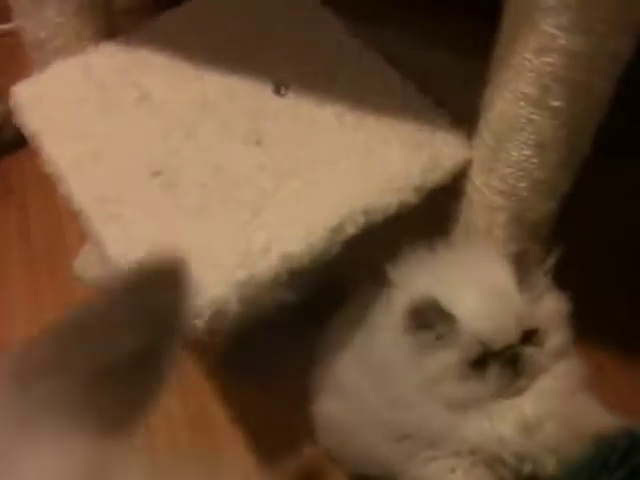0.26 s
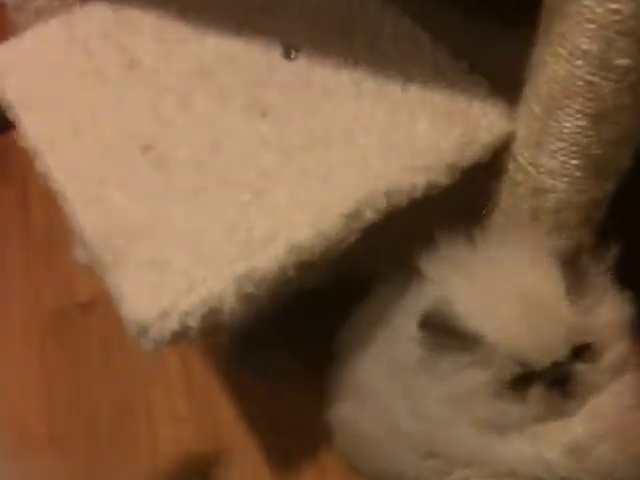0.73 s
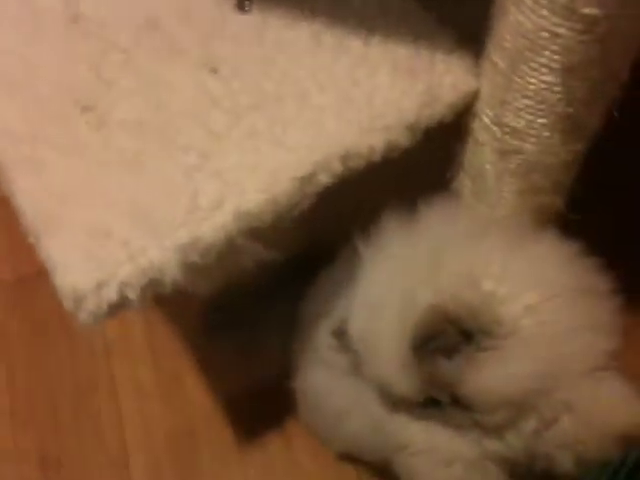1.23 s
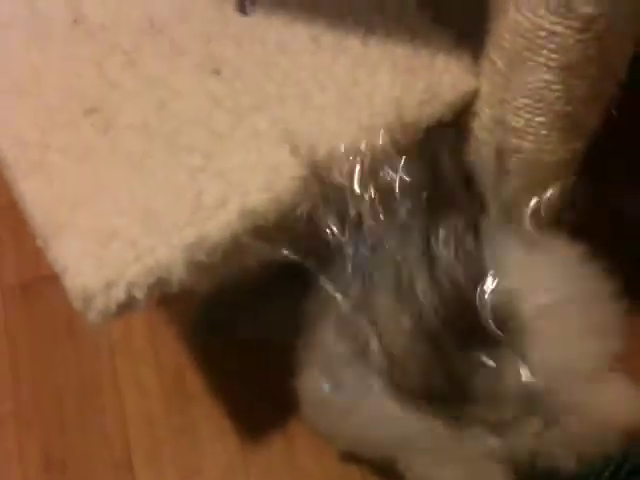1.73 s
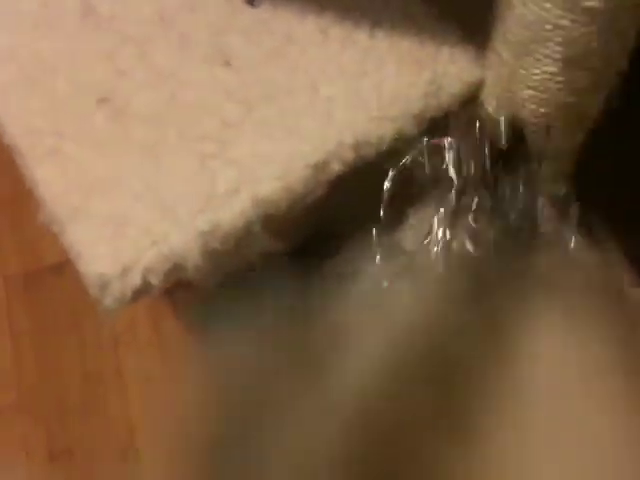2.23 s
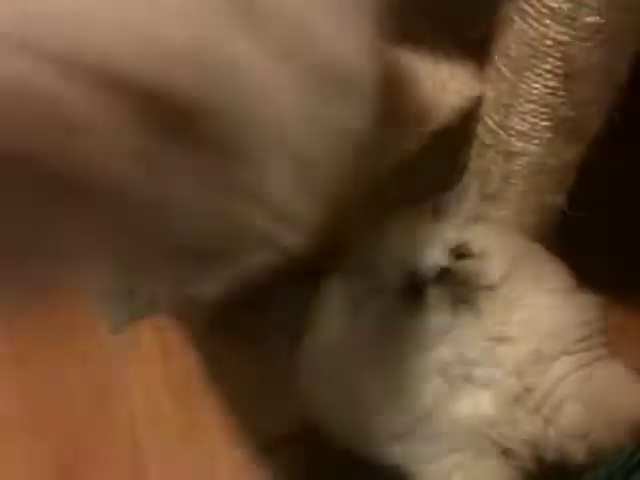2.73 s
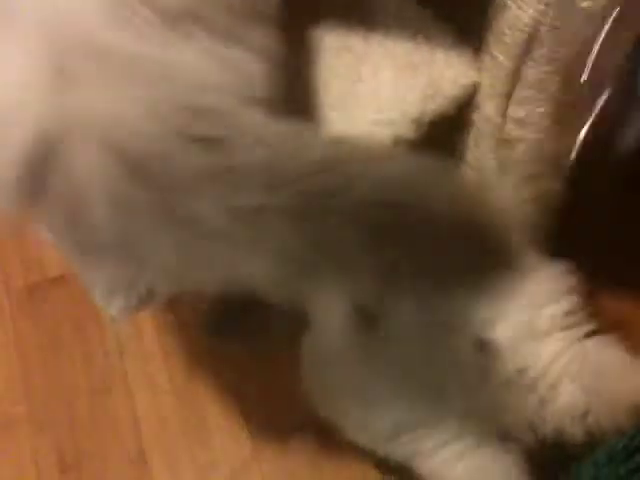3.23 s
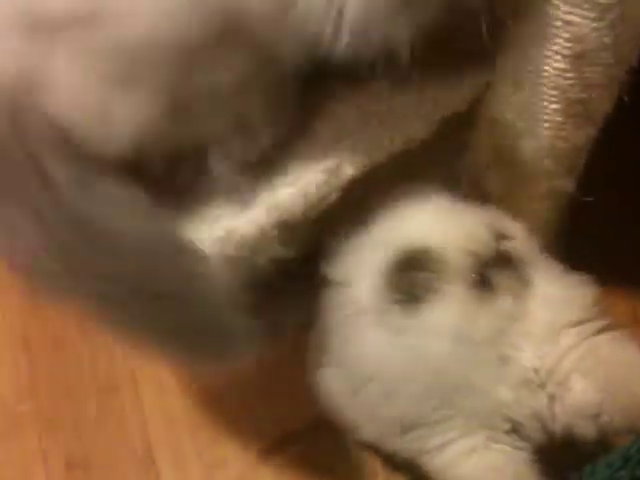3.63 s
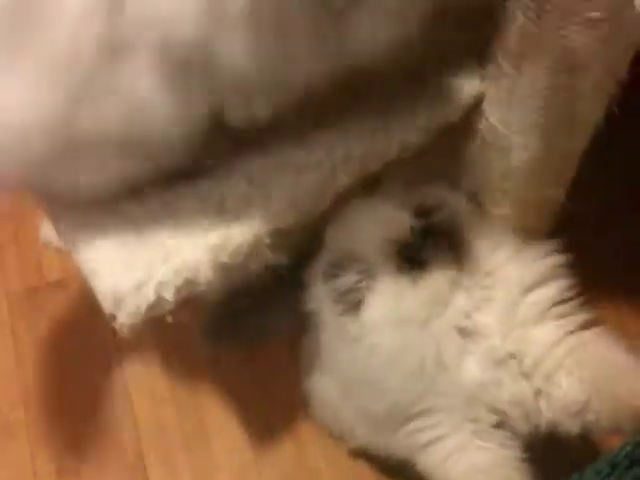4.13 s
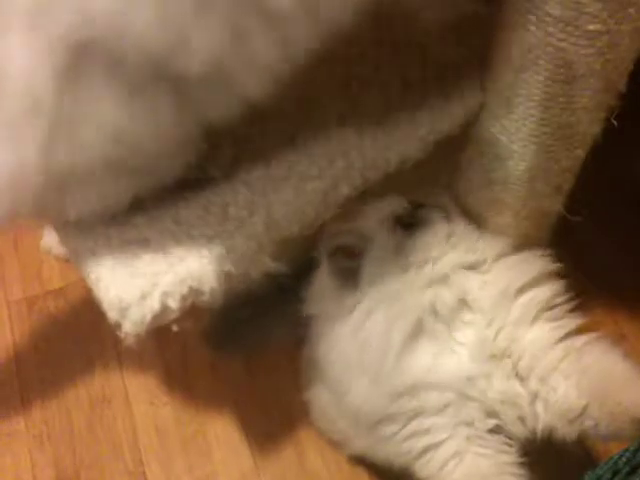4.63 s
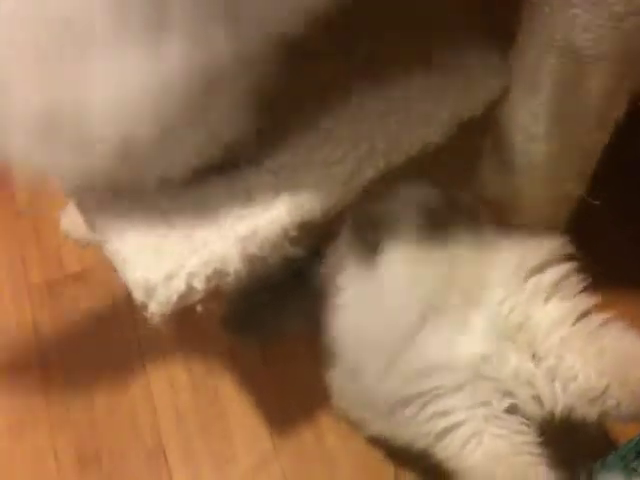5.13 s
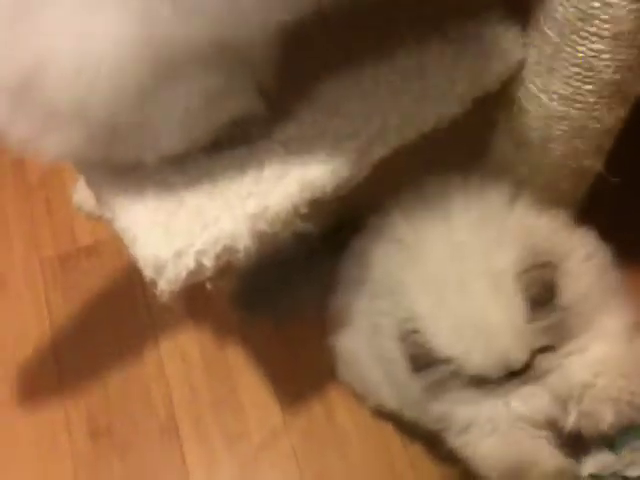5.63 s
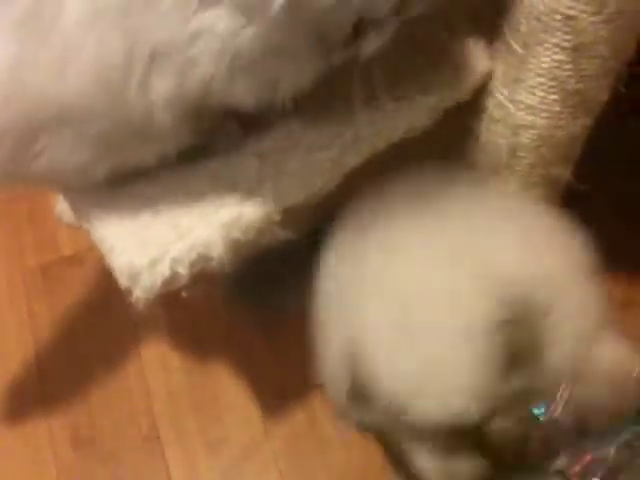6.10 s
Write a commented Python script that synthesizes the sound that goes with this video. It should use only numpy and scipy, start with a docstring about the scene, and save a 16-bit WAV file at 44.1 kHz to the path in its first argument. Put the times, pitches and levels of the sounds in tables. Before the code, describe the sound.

Faint tinsel crinkling, tiny ticks and soft paw thumps, broken once by a sharp, close rattling knock on the camera's case.

```python
"""Foil strands rustle over a hushed room tone while kittens play on a carpeted cat tree with a wand toy.
Paws scuff the carpet and pad on the boards; foil and claws tick, and one tiny squeak rises. Once the toy
strikes the camera case: it clicks, bounces, scrapes along it and ends in duller knocks.
Friction and foil are filtered random grains, impacts are decaying noise bursts, the case is a sum of modes,
and the room tone is coloured noise with wavering sines."""
import sys
import numpy as np
from scipy import signal
from scipy.fft import rfft, irfft
from scipy.io import wavfile

SR = 44100
rng = np.random.default_rng(int(sys.argv[2]) if len(sys.argv) > 2 else 0)


def wav_record(signal):
    """Record a signal, one row per channel, as 16-bit PCM in the file named by sys.argv[1]."""
    frames = np.transpose(np.atleast_2d(signal))
    bounded = np.clip(frames, -1, 1)
    # unit amplitude maps onto the largest positive 16-bit level
    quanta = np.round(bounded * 32767).astype(np.int16)
    wavfile.write(sys.argv[1], SR, quanta)


N = 280476
TIME = np.arange(N) / SR

# Movement levels are nominal, before random modulation and reflections.
# Swings of the tinsel toy: start_s, rise_s, hold_s, level_db
TINSEL_SWINGS = [(0, 0.015, 0.087, -74.5), (.125, 0.057, 0.043, -57.5), (.4, 0.036, .07, -70.5),
                 (.53, .03, 0.17, -64), (.75, 0.014, .01, -68), (.83, 0.013, 0.025, -73.5),
                 (1.04, 0.082, 0.0043, -63), (1.52, 0.039, 0.13, -65), (1.93, 0.027, .11, -57.5),
                 (2.09, 0.029, 0.19, -66), (2.435, .02, 0.059, -60.5), (2.62, 0.042, .02, -61.5),
                 (2.77, .03, 0.063, -67.5), (3.37, 0.095, 0.052, -64.5), (3.72, 0.065, .005, -67.5),
                 (3.845, 0.0095, .003, -69.5), (4.0, 0.09, 0.016, -58.5), (4.25, 0.026, 0.078, -57),
                 (4.37, 0.018, 0.031, -52), (4.62, 0.037, 0.34, -65.5), (5.13, 0.024, 0.2, -63.5),
                 (5.745, 0.056, 0.045, -59), (5.85, 0.033, 0.031, -56), (6.035, 0.0095, .015, -62),
                 (6.15, 0.073, 0.12, -58.5)]
SETTLE_DB_PER_S, IDLE_DB = 100, -76  # the strands settle after a swing, but never quite
# Relative spectral density of the tinsel: frequency_hz, density_db
TINSEL_SPECTRUM = [(800, -22.5), (2500, -8), (4500, -6.5), (6500, -2), (8500, -1.5), (11000, -2.5),
                   (16000, -5.5)]
# Foil snaps and claw catches, level as rms over 1 ms: start_s, level_db, pitch_hz
FOIL_AND_CLAW_TICKS = [(0.632, -46.5, 6440), (1.4088, -54.5, 1490), (1.4636, -54, 9100),
                       (1.6405, -58.5, 1800), (1.7403, -52, 6490), (3.064, -61, 7000),
                       (3.1594, -54.5, 7000), (3.545, -52, 12000), (3.6103, -49.5, 13000),
                       (4.1091, -48, 9100), (4.398, -46, 7400), (4.52, -45, 8550), (5.032, -53, 4330),
                       (5.0358, -50, 4000), (5.238, -44, 6150), (5.2729, -44.5, 8000),
                       (5.2855, -47.5, 6500), (5.447, -57.5, 6770), (5.5516, -57.5, 3900),
                       (6.3313, -49.5, 6450)]

# Blows on the camera case, level as rms over 1 ms: start_s, level_db, hardness (0 to 1)
CASE_BLOWS = [(1.8096, -9, 0.99), (1.813, -16.5, 0.99), (1.8159, -27.5, 0.93), (1.819, -31, 0.8),
              (1.8225, -17.5, 0.99), (1.8851, -28, .05), (1.8903, -15, 0.12), (1.8918, -22, 0.03),
              (1.8942, -27, .05), (1.899, -40.5, 0.07), (1.905, -38.5, 0), (1.9086, -38, .2),
              (1.9131, -43, .4)]
# Relative spectral density of a hard and of a soft blow: frequency_hz, density_db
HARD_SPECTRUM = [(40, -31.5), (330, -18), (900, -9), (2000, -5.5), (3500, 0), (5400, -5.5), (7600, -1.5),
                 (10200, -14), (13000, -1), (16000, -7.5)]
SOFT_SPECTRUM = [(40, -28), (140, -5), (280, -6), (500, 2.5), (900, -8), (1400, -2.5), (1900, -1),
                 (3400, -6.5), (7000, -16.5), (9000, -15.5), (16000, -32.5)]
# Modes of the camera case, relative levels: frequency_hz, level_db, t60_s
CASE_MODES = [(189.4, -14, 0.07), (385, -9.5, .05), (562, -12.5, .045), (858, -6, 0.042), (1318, -9, .035),
              (1486, -10, .04), (1955, -4, 0.019), (2100, -6.5, .035), (2870, -6, 0.032),
              (3347, -9.5, 0.042), (3560, -10.5, 0.023), (3840, -10, 0.01), (4200, -8, .03),
              (5550, -10.5, .03), (8150, -7.5, 0.022)]
# The toy scraping over the case between blows: start_s, rise_s, hold_s, hiss_db, chatter_db
CASE_SLIDES = [(1.806, .004, 0.0054, -34.5, -38), (1.821, .003, .007, -47.5, -40.5),
               (1.838, .004, .03, -39, -45.5), (1.873, .002, .003, -40.5, -33),
               (1.879, .003, .003, -36.5, -32), (1.9, .004, .006, -51, -52)]
RELEASE_DB_PER_S = 2399.5  # a scrape stops when the contact is lost
CHATTER_HZ, SAG_HZ_PER_S = 3293, 16000  # mean pitch at first touch, and its fall as the toy slows
# Relative spectral density of the scraping hiss: frequency_hz, density_db
SCRAPE_SPECTRUM = [(59, -50.5), (100, -19), (215, -15), (930, -22.5), (1230, -13), (2690, -6.5),
                   (3190, -10), (5650, -6.5), (12700, -16), (16000, -20.5)]

# Paws dragging on carpet: start_s, rise_s, hold_s, level_db
CARPET_DRAGS = [(.08, 0.056, .11, -73.5), (.53, 0.026, 0.2, -73), (1.07, 0.027, 0.069, -71.5),
                (4.27, 0.15, 0.021, -69.5), (5.12, 0.066, 0.09, -66.5), (5.75, 0.032, 0.097, -65.5),
                (6.04, 0.019, 0.27, -74.5)]
LIFT_DB_PER_S, FIDGET_DB = 132, -82  # a drag dies as the paw lifts; the kittens stir in between
# Relative spectral density of paw on carpet: frequency_hz, density_db
CARPET_SPECTRUM = [(70, -23), (150, 4), (400, 0), (700, 1), (1500, -2), (3000, -7.5), (6000, -13),
                   (16000, -27)]
# Paws on the boards, rms over 1 ms before the bass cut: start_s, tap_db, thump_db, thump_pitch_hz
PAW_STEPS = [(.141, -59, -59, 150), (0.556, -57, -58, 201), (0.631, -52, -57, 300),
             (0.704, -54.5, -55, 297), (1.012, -56.5, -59.5, 220), (1.4092, -51.5, -66, 295),
             (1.64, -53.5, -53, 256), (2.108, -54, -49, 136), (2.63, -61, -57.5, 110.4),
             (2.925, -71, -56, 85.2), (5.2374, -53.5, -47.5, 168), (5.2828, -48, -68, 300),
             (5.292, -53.5, -53, 164.3), (5.7613, -49, -66, 249.5), (5.779, -61, -61, 248),
             (5.8085, -53, -59.5, 300), (6.046, -47, -50.5, 170), (6.052, -54, -50, 477),
             (6.066, -58, -49.5, 147), (6.124, -71, -51.5, 140), (6.204, -72, -50, 148)]
SQUEAK_START_S = 1.168

# Relative spectral density of the room noise: frequency_hz, density_db
ROOM_SPECTRUM = [(18, -49.5), (30, -26), (145, -11.5), (174, -6.5), (364, -4), (426, -7.5), (844, -9.5),
                 (962, -12), (1670, -14.5), (4190, -20), (4530, -17.5), (5740, -19.5), (12300, -22.5),
                 (16000, -21)]
ROOM_DB = -71
# Partials of a distant appliance, rms level: frequency_hz, level_db
APPLIANCE_HUM = [(177.6, -84.5), (357, -86.5), (612, -90), (1581, -94), (2040, -94.5), (2277, -96),
                 (4409, -91.5)]
# A small motor's whine, rms level: time_s, pitch_hz, level_db
MOTOR_WHINE = [(0, 844, -78), (.6, 842, -81), (1.4, 849, -81), (2.0, 850.3, -85), (6.36, 853, -86)]
TOP_HZ = 15800  # upper edge of the camera's pass band


def tinsel(flutter_db=1.74, sway_db=1, crinkle_db=-2, crinkle_t60=0.01, pop_db=-11, pop_rate=40):
    """Friction and buckling: foil strands brush together, crinkle in five pitch bands and now and then pop."""
    brushing = gain(flutter_db * walk(60)) * grains(14000, 2.5)
    crinkle = np.zeros(N)
    for hz in (3000, 5030, 7460, 9870, 13600):
        buckling = signal.fftconvolve(np.abs(grains(70, 1.4)), decay(crinkle_t60))[:N]
        crinkle += resonate(buckling * rng.standard_normal(N), hz, 1.6)
    pops = unit_rms(resonate(grains(pop_rate, 1.5), 9000, .9))
    foil = brushing + gain(crinkle_db) * unit_rms(crinkle) + gain(pop_db) * pops
    motion = movements(TINSEL_SWINGS, SETTLE_DB_PER_S, IDLE_DB) * gain(sway_db * walk(25))
    return motion * unit_rms(shape_spectrum(foil, TINSEL_SPECTRUM))


def ticks(snap_t60=0.0027, tail_db=-12, tail_t60=.025, q=.8, crack_db=-13):
    """Impulsive release: each snap of foil or claw excites a broad resonance over an unfiltered crack."""
    out = np.zeros(N)
    for start, db, hz in FOIL_AND_CLAW_TICKS:
        snap = noise_burst(snap_t60) + gain(tail_db) * noise_burst(tail_t60)
        pitched = unit_burst(resonate(resonate(snap, hz, q), hz, q))
        add(out, start, gain(db) * unit_burst(pitched + gain(crack_db) * snap))
    return out


def blows(crack_db=-11, crack_t60=0.0023, ring_db=-9.5, rattle_db=-18, rattle_t60=0.059,
          rebound_s=.00027, rebound_db=-9):
    """Impact: hard contact is bright and rebounds at once, soft contact is dull; both ring the case."""
    out = np.zeros(N)
    for start, db, hardness in CASE_BLOWS:
        crack = gain(crack_db) * noise_burst(crack_t60)
        rattle = gain(rattle_db) * noise_burst(rattle_t60)
        push = unit_burst(signal.unit_impulse(len(crack)))
        hard = np.clip(hardness, 0, 1)
        rebound = hard * gain(rebound_db) * np.roll(push, int(rebound_s * SR))
        force = crack + rattle + push + rebound
        bright = unit_burst(disperse(shape_spectrum(force, HARD_SPECTRUM)))
        dull = unit_burst(shape_spectrum(force, SOFT_SPECTRUM))
        hit = unit_burst(hard * bright + (1 - hard) * dull)
        ring = gain(ring_db) * unit_burst(case_ring(hit))
        add(out, start, gain(db) * unit_burst(hit + ring))
    return out


def slide(jitter=.28, ring_db=-9, uneven_db=4, grit_db=3, catch_db=2):
    """Stick-slip: ridges chatter over the case edge, falling in pitch, with a gritty catching hiss."""
    hz = np.clip(CHATTER_HZ - SAG_HZ_PER_S * (TIME - CASE_SLIDES[0][0]), 0, CHATTER_HZ)
    cycles = np.cumsum(hz * (1 + jitter * walk(2500))) / SR
    chatter = unit_rms(np.sin(2 * np.pi * cycles) * gain(uneven_db * walk(900)))
    grit = grains(9000, grit_db) * gain(catch_db * walk(500))
    hiss = unit_rms(shape_spectrum(grit, SCRAPE_SPECTRUM))
    hiss_gain, chatter_gain = np.zeros(N), np.zeros(N)
    for start, rise, hold, hiss_db, chatter_db in CASE_SLIDES:
        hiss_gain += movement(start, rise, hold, hiss_db, RELEASE_DB_PER_S)
        chatter_gain += movement(start, rise, hold, chatter_db, RELEASE_DB_PER_S)
    chatter *= chatter_gain
    ring = gain(ring_db) * np.std(chatter) * unit_rms(case_ring(chatter))
    return hiss * hiss_gain + chatter + ring


def case_ring(force):
    """Modal superposition: the case answers a force as a sum of decaying cosines."""
    ring = 0
    for hz, db, t60 in CASE_MODES:
        envelope = decay(t60)
        ring = ring + gain(db) * envelope * np.cos(2 * np.pi * hz * np.arange(len(envelope)) / SR)
    return signal.fftconvolve(force, unit_energy(ring))[:len(force)]


def disperse(x, spread=0.46, count=5):
    """Dispersion of bending waves in a thin shell: all-pass filters delay the bass behind the treble."""
    for _ in range(count):
        x = signal.lfilter([-spread, 1], [1, -spread], x)
    return x


def scuffs(catch_db=2.0):
    """Stick-slip friction: fur and claws catch and slip through the carpet pile."""
    motion = movements(CARPET_DRAGS, LIFT_DB_PER_S, FIDGET_DB) * gain(catch_db * walk(55))
    return motion * unit_rms(shape_spectrum(grains(2500, 4.6), CARPET_SPECTRUM))


def paws(tap_t60=0.066, thump_t60=0.12, q=2.14, low_hz=80):
    """Impact on a small radiator: carpet tap and resonant board thump, with little deep bass."""
    out = np.zeros(N)
    for start, tap_db, thump_db, hz in PAW_STEPS:
        tap = shape_spectrum(noise_burst(tap_t60), CARPET_SPECTRUM)
        thump = resonate(resonate(noise_burst(thump_t60), hz, q), hz, q)
        add(out, start, gain(tap_db) * unit_burst(tap))
        add(out, start, gain(thump_db) * unit_burst(thump))
    return signal.sosfilt(signal.butter(3, low_hz, "high", fs=SR, output="sos"), out)


def squeak(length_s=0.057, from_hz=3930, to_hz=4130, peak_db=-72):
    """Frequency glide: one tiny sine rises in pitch under a smooth swell."""
    out, count = np.zeros(N), int(length_s * SR)
    cycles = np.cumsum(np.linspace(from_hz, to_hz, count)) / SR
    add(out, SQUEAK_START_S, gain(peak_db) * np.hanning(count) * np.sin(2 * np.pi * cycles))
    return out


def reflections(x, t60=0.1, wet_db=-15):
    """Reverberation: convolution with decaying noise gives a furnished room's short, soft answer."""
    return gain(wet_db) * signal.fftconvolve(x, unit_energy(noise_burst(t60)))[:N]


def room_tone(octave_db=-91, low_hz=450, low_vary_db=1.5):
    """Stationary tones and noise: hum, a fading whine, hiss, and low noise whose level varies at random."""
    times, pitches, levels = np.transpose(MOTOR_WHINE)
    whine_hz, whine_db = np.interp(TIME, times, pitches), np.interp(TIME, times, levels)
    whine = tone(whine_hz, whine_db) + tone(2 * whine_hz, octave_db)
    hum = sum(tone(hz, db) for hz, db in APPLIANCE_HUM)
    noise = shape_spectrum(rng.standard_normal(N), ROOM_SPECTRUM)
    low = signal.sosfiltfilt(signal.butter(2, low_hz, fs=SR, output="sos"), noise)
    varying_low = low * gain(low_vary_db * walk(17))
    return gain(ROOM_DB) * unit_rms(noise - low + varying_low) + hum + whine


def tone(hz, db, waver_hz=2):
    """Frequency modulation: a slightly unsteady sine at an rms level."""
    cycles = np.cumsum(hz + waver_hz * walk(25)) / SR
    return gain(db) * np.sqrt(2) * np.sin(2 * np.pi * cycles)


def movement(start, rise, hold, db, fall_db_per_s):
    """Amplitude envelope: linear swell, hold and exponential decay."""
    t = TIME - start
    swell = np.clip(t / max(rise, 1 / SR), 0, 1)
    return swell * gain(db - fall_db_per_s * np.maximum(t - rise - hold, 0))


def movements(rows, fall_db_per_s, rest_db):
    """Incoherent addition: movements add in power over a faint stirring."""
    power = sum(movement(*row, fall_db_per_s) ** 2 for row in rows)
    return np.sqrt(gain(rest_db) ** 2 + power)


def grains(rate, spread_db):
    """Random impacts: sparse impulses of either sign, most weak and a few strong, at rms 1."""
    size = gain(spread_db * np.minimum(rng.exponential(size=N), 5))
    return unit_rms((rng.random(N) < rate / SR) * size * rng.choice([-1, 1], N))


def noise_burst(t60):
    """Exponential decay of noise, scaled as a short sound."""
    envelope = decay(t60)
    return unit_burst(envelope * rng.standard_normal(len(envelope)))


def decay(t60, size=8192):
    """Exponential decay: amplitude falls 60 dB in t60 seconds."""
    return np.exp(-np.log(1000) * np.arange(size) / SR / t60)


def walk(rate):
    """Random modulation: line segments between rate random values a second, at rms 1."""
    return unit_rms(np.interp(TIME * rate, np.arange(N), rng.standard_normal(N)))


def shape_spectrum(x, points, size=2048):
    """Minimum-phase filtering: folding the cepstrum gives a causal filter of the given spectrum."""
    hz, db = np.transpose(points)
    bins_hz = np.maximum(np.arange(size // 2 + 1) * SR / size, 1)
    magnitude = gain(np.interp(np.log(bins_hz), np.log(hz), db))
    cepstrum = irfft(np.log(magnitude))
    cepstrum[1:size // 2] *= 2
    cepstrum[size // 2 + 1:] = 0
    response = irfft(np.exp(rfft(cepstrum)))
    return signal.fftconvolve(x, response)[:len(x)]


def resonate(x, hz, q):
    """Resonance: a two-pole band-pass, with limits on its pitch and sharpness."""
    b, a = signal.iirpeak(min(hz, SR / 3), max(q, 1 / np.sqrt(2)), SR)
    return signal.lfilter(b, a, x)


def gain(db):
    """Level law: decibels to amplitude ratio."""
    return 10 ** (np.asarray(db) / 20)


def unit_rms(x):
    """Mean power: scale to rms 1."""
    return x / np.sqrt(np.mean(x ** 2))


def unit_energy(x):
    """Total energy: scale the sum of squares to 1."""
    return x / np.sqrt(np.sum(x ** 2))


def unit_burst(x):
    """Energy of a short sound: scale to that of one millisecond at rms 1."""
    return unit_energy(x) * np.sqrt(SR / 1000)


def add(out, start_s, x):
    """Superposition: mix x into out from start_s."""
    i = int(start_s * SR)
    out[i:i + len(x)] += x[:N - i]


def scene():
    """Direct and reflected paths: play sounds through the room, contact with the case only directly."""
    play = tinsel() + ticks() + scuffs() + paws() + squeak()
    contact = blows() + slide()
    return (play + reflections(play) + contact + room_tone())[None]


def record(dry):
    """Band limiting: the camera's steep elliptic low-pass cuts the top."""
    return signal.sosfilt(signal.ellip(10, .2, 70, TOP_HZ, fs=SR, output="sos"), dry)


dry = scene()
out = record(dry)
wav_record(out)
```